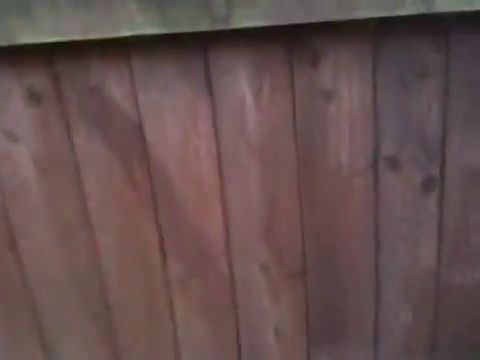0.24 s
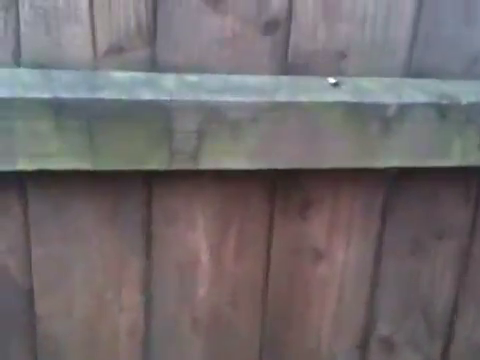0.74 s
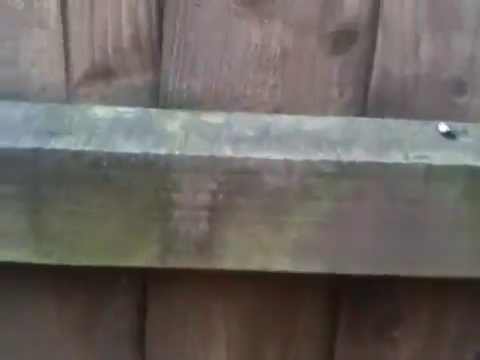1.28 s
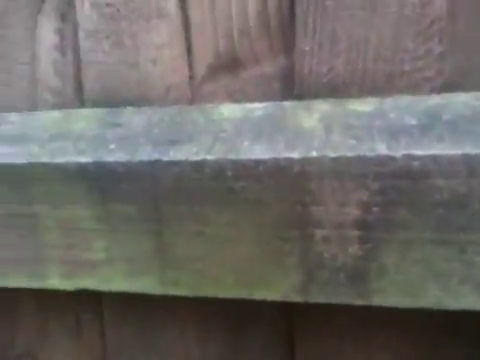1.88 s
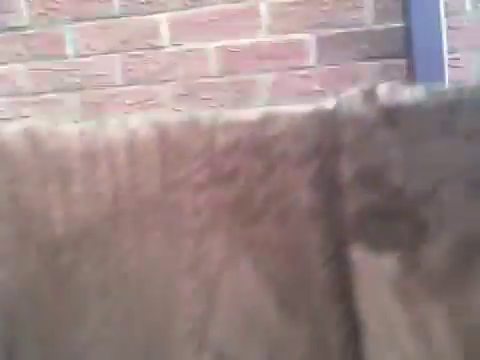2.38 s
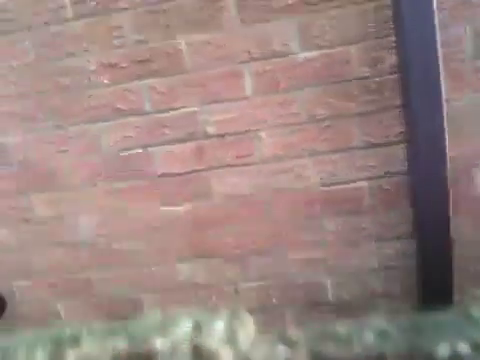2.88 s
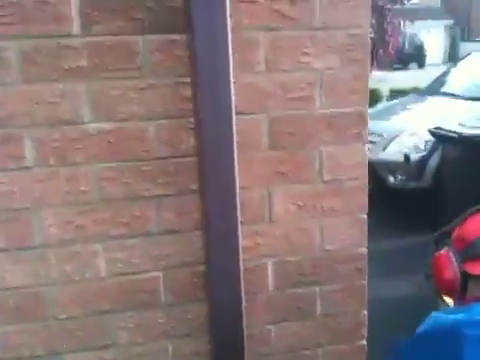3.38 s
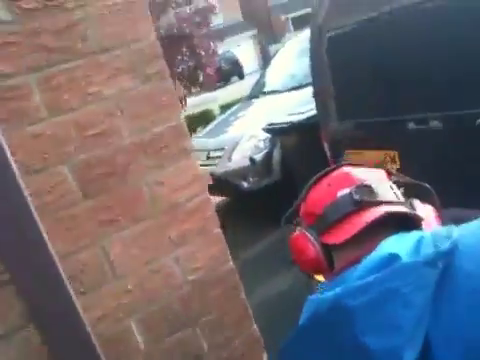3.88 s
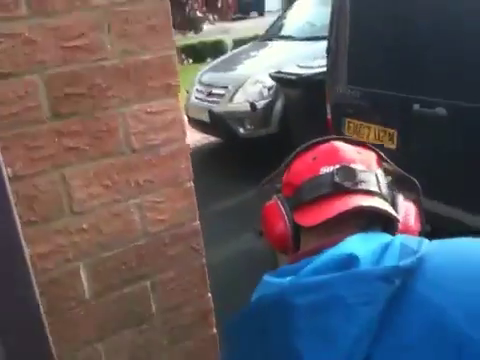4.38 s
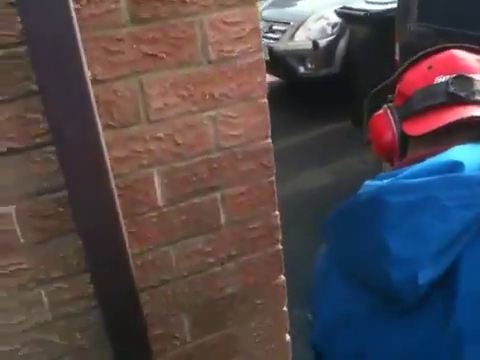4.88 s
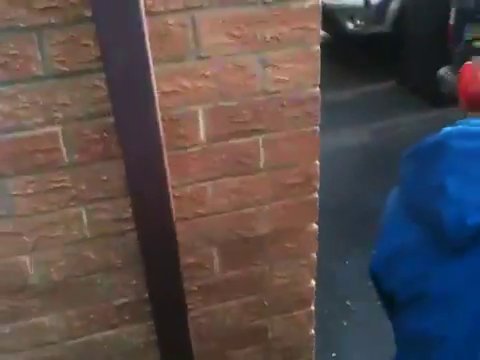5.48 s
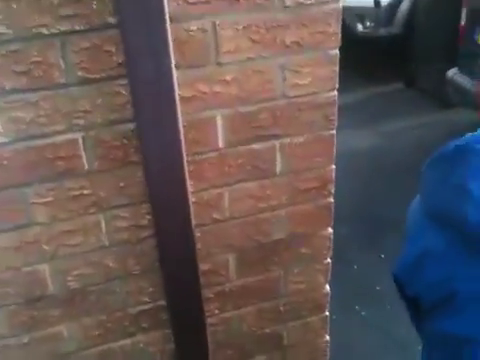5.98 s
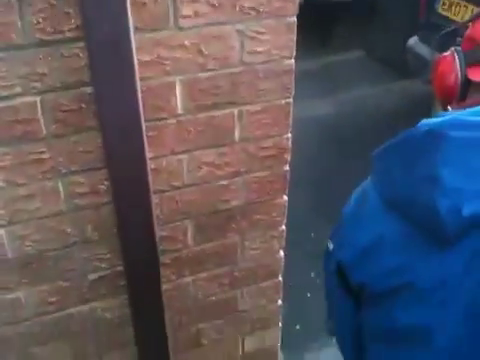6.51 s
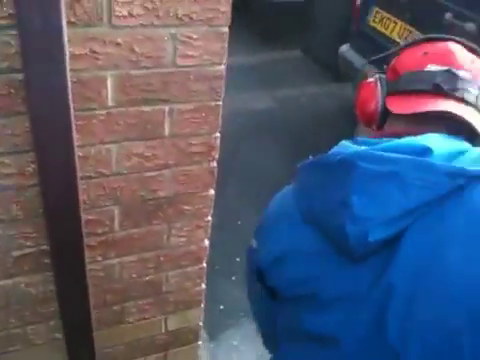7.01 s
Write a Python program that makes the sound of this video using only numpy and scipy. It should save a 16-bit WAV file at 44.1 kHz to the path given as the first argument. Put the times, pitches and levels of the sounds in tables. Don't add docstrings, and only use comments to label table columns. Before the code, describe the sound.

A low, buzzing engine hum with soft clatter runs alone at first, heard through a fence. Then a thump and a short burst of escaping air; the motor slows. Stuttering finger rubs and dull bumps accompany the moving phone microphone as the hiss climbs steeply. Past the wall corner it is a loud, broad, gritty air blast nearly covering the motor.

```python
import sys
import numpy as np
from scipy import signal
from scipy.fft import rfft, irfft, next_fast_len
from scipy.io import wavfile
from scipy.ndimage import uniform_filter1d, map_coordinates

SR = 44100
rng = np.random.default_rng(int(sys.argv[2]) if len(sys.argv) > 2 else 0)


def to_wav(s):
    ch = np.atleast_2d(s).T
    pcm = np.round(np.clip(ch, -1, 1) * 32767)
    wavfile.write(sys.argv[1], SR, pcm.astype(np.int16))


def gain_from_db(level_db):
    decades = np.asarray(level_db, float) / 20
    return 10 ** decades


N = 319725


def unit(x):
    return x / np.sqrt(np.mean(x ** 2) + 1e-20)


def along(points, hz):
    f, v = np.transpose(points)
    return np.interp(np.log(hz + 1), np.log(f + 1), v)


def curves(rows, t=None):
    s, *cols = np.transpose(rows)
    times = np.arange(N) / SR if t is None else t
    return [np.interp(times, s, c) for c in cols]


def wobble(rate):
    knots = rng.standard_normal(int(N * rate / SR) + 4)
    return map_coordinates(knots, [np.arange(N) * rate / SR])


def patches(shape, size):
    field = uniform_filter1d(rng.standard_normal(shape), size=size[0], axis=0)
    return unit(uniform_filter1d(field, size=size[1], axis=1))


def shaped(colour_db, patchy_db, size, gaps=False):
    hz, t, z = signal.stft(rng.standard_normal(N + size), SR, nperseg=size)
    level_db = colour_db(hz[:, None], t) + patchy_db * patches(z.shape, size=(6, 30))
    if gaps:
        depth = np.clip(5 * (patches(z.shape, size=(2, 12)) - 1.85), 0, 1)
        level_db = level_db - 18 * depth
    gain = gain_from_db(level_db)
    gain = gain / np.sqrt(np.mean(gain ** 2, axis=0))
    return unit(signal.istft(z * gain, SR, nperseg=size)[1][:N])


def rung(x, hz, width_hz):
    return signal.lfilter(*signal.iirpeak(hz, hz / width_hz, SR), x)


def rung_twice(x, hz, width_hz):
    return rung(rung(x, hz, width_hz), hz, width_hz)


# [t/s, state]
ENGINE_STATE = [
    (0, 0),
    (.58, 0),
    (.78, 1),
    (1.8, 1),
    (2.1, 2),
    (3.3, 2),
    (3.9, 3),
]


def by_state(values):
    return np.interp(curves(ENGINE_STATE)[0], np.arange(len(values)), values)


# [t/s, turns per s]
SHAFT_SPEED = [(0.0, 30.6), (0.08, 31.5), (0.34, 34.0), (0.44, 34.4), (0.81, 32.8), (1.35, 33.4),
               (1.84, 33.6), (2.02, 32.4), (2.12, 30.0), (2.22, 30.0), (2.44, 30.6), (2.77, 30.9),
               (3.21, 30.6), (3.39, 31.1), (4.42, 31.1), (5.4, 30.8), (5.9, 31.2), (7.25, 30.95)]
# [multiple of shaft speed, level/dB]
RACING_ORDERS = [(1, -39), (2, -22), (3, -26), (4, 0.5), (5, -0.5), (6, -11), (7, -7), (8, 5.5), (9, -12),
                 (10, -15), (11, -25), (12, -17), (13, -15), (14, -11), (15, -24), (16, -11), (17, -10),
                 (18, -20), (19, -15), (20, -13), (21, -7)]
FREE_ORDERS = [(1, -39), (2, -20), (3, -17), (4, 3.5), (5, 2), (6, -1.5), (7, 1), (8, 1.5), (9, -9),
               (10, -4), (11, -4.5), (12, -4.5), (13, -21), (14, -24), (15, -21), (16, -14), (17, -12),
               (18, -14), (19, -17), (20, -8), (21, -5.5)]
SLOWED_ORDERS = [(1, -37), (2, -26), (3, -17), (4, -3), (5, 3), (6, -3.5), (7, 3), (8, -4.5), (9, -16),
                 (10, -7), (11, -7), (12, -10), (13, -26), (14, -7), (15, -8), (16, -8), (17, -27),
                 (18, -11), (19, -13), (20, -23), (21, -11)]
PUMPING_ORDERS = [(1, -37), (2, -30), (3, -17), (4, 0), (5, 2), (6, -10.5), (7, 0), (8, 3), (9, -28),
                  (10, -0.5), (11, -13.5), (12, -12), (13, -15), (14, -10), (15, -20), (16, -16), (17, -28),
                  (18, -11), (19, -10), (20, -22), (21, -6)]
HUM_DB = [-39, -40.5, -34.5, -32]
CLATTER_DB = [-39.5, -39, -36, -31]
RUMBLE_DB = [-47.5, -58, -41, -39.5]
# [f/Hz, level/dB per Hz]
EXHAUST_COLOUR = [(20, -70), (40, -50), (75, -26), (110, -8), (150, -6), (260, -0.5), (380, -8), (600, -32),
                  (1500, -120)]
# [f/Hz, level/dB per Hz]
CASING_COLOUR = [(150, -46), (300, -9), (473, -14), (900, -6), (1500, -6), (1900, -8), (2400, -7),
                 (2900, -16), (5200, -23.5), (6400, -23), (8000, -26.5), (11400, -34.5), (14000, -44),
                 (17000, -58)]
# [f/Hz, width/Hz, level/dB, t/s, duration/s]
PANEL_RINGS = [(886, 24, -41, 1.57, 0.69), (897, 21, -45.5, 0.5, 0.3), (1670, 14, -45, 0.45, .14),
               (2250, 30, -48, 0.24, .08), (2190, 16, -49, 1.08, 0.17), (1434, 18, -46, 0.24, 0.2),
               (1454, 10, -46.5, 0.87, 0.5), (1295, 19, -45, 0.39, .14), (1370, 20, -47, 1.54, .15),
               (1180, 27, -45, 0.53, .06), (654, 25, -47.5, 1.04, 0.37), (683, 61, -41.5, 1.95, 0.13)]
# [t/s, level/dB, duration/s]
FOOTFALLS = [
    (0, -48, .05),
    (.68, -41, .05),
    (1.8, -36.5, 0.048),
    (3.15, -37.5, 0.15),
    (3.8, -37.5, 0.33),
    (4.15, -47, 0.088),
]


def compressor():
    t = np.arange(N) / SR
    speed = curves(SHAFT_SPEED)[0]
    phase = 2 * np.pi * np.cumsum(speed) / SR
    multiples = np.transpose(FREE_ORDERS)[0]
    orders_db = np.transpose([RACING_ORDERS, FREE_ORDERS, SLOWED_ORDERS, PUMPING_ORDERS])[1]
    hum = np.zeros(N)
    for k, state_db in zip(multiples, orders_db):
        level = gain_from_db(by_state(state_db) + 1.95 * wobble(5))
        hum += level * np.sin(k * phase + rng.uniform(0, 2 * np.pi))
    hum_db = by_state(HUM_DB) + 0.68 * (speed - 32.94)

    rumble = shaped(lambda hz, s: along(EXHAUST_COLOUR, hz) + 0 * s, patchy_db=1.6, size=4096)
    swell = gain_from_db(by_state(RUMBLE_DB))
    for s, db, wide in FOOTFALLS:
        swell = swell + gain_from_db(db) * np.exp(-((t - s) / wide) ** 2)

    clatter = shaped(lambda hz, s: along(CASING_COLOUR, hz) + 0 * s, patchy_db=0.93, size=2048)
    panels = np.zeros(N)
    for hz, width_hz, db, s, wide in PANEL_RINGS:
        ring = unit(rung(rng.standard_normal(N), hz, width_hz))
        panels += gain_from_db(db) * np.exp(-((t - s) / wide) ** 2) * ring
    return gain_from_db(hum_db) * unit(hum) + swell * rumble + gain_from_db(by_state(CLATTER_DB)) * clatter + panels


# [t/s, level/dB]
AIR_PUFFS = [(.28, -69), (2.1, -73), (2.7, -52), (3.16, -57), (3.43, -65), (3.67, -42), (3.94, -55),
             (4.16, -57), (4.54, -61), (5.94, -68), (6.14, -67), (6.3, -68), (6.46, -68), (6.62, -67),
             (6.93, -71), (7.1, -66)]


def buffet():
    t = np.arange(N) / SR
    band = signal.butter(4, [44, 85], "band", fs=SR, output="sos")
    low = signal.sosfilt(band, rng.standard_normal(N))
    push = gain_from_db(by_state([-74, -74, -82, -80]))
    for s, db in AIR_PUFFS:
        push = push + gain_from_db(db - 180 * np.abs(t - s))
    return push * unit(low * gain_from_db(3.7 * wobble(12)))


# [t/s, level/dB]
CASE_TICKS = [
    (.107, -56),
    (.268, -46),
]
# [t/s, level/dB, f/Hz, width/Hz, t60/s]
BUMPS = [
    (0.661, -36, 170, 90, .12),
    (1.75, -58, 35, 30, .1),
    (1.78, -24.5, 228, 24, 0.21),
    (1.83, -34.5, 390, 80, 0.22),
    (2.62, -23, 210, 60, 0.095),
    (3.12, -35, 280, 120, .15),
    (5.527, -24, 420, 281, 0.22),
]


def knocks():
    out, t = np.zeros(N + SR), np.arange(SR // 4) / SR
    for s, db, hz, width_hz, t60 in BUMPS:
        settled = rung_twice(rng.standard_normal(SR), hz, width_hz)[-len(t):]
        attack = np.clip(t / 0.018, 0, 1)
        out[round(s * SR):][:len(t)] += gain_from_db(db - 60 * t / t60) * attack * unit(settled)
    for s, db in CASE_TICKS:
        grit = rng.standard_normal(len(t))
        tick = unit(rung(grit, 11500, 500)) + unit(rung_twice(grit, 14800, 1400))
        out[round(s * SR):][:len(t)] += gain_from_db(db - 60 * t / .03) * tick
    return out[:N]


# [t/s, level/dB, screened by fence and wall 0-1, hump f/Hz, turned to phone/dB]
JET_PATH = [(1.75, -29, 0.96, 7600, -5), (2.04, -24.5, 0.9, 7700, 5.5), (2.42, -21.5, 1, 8200, -0.5),
            (2.64, -16, 1, 9800, -5.5), (2.82, -16, 0.9, 8460, -1.5), (3.2, -5, 1, 8900, -1),
            (3.39, -9.5, 0.8, 7700, 0), (3.71, -4.5, 1, 8440, 3.5), (3.85, -7, 0.78, 7650, 5),
            (3.99, -7.5, .1, 8200, 0), (4.11, -6.5, 0.15, 6600, 0.5), (4.36, -9, 0.08, 8100, 2.5),
            (5.09, -11.5, 0, 8900, -.5), (5.6, -10, 0.18, 7760, -1.5), (6.2, -10.5, 0.08, 8000, 2),
            (6.38, -8.5, 0.04, 8950, 2), (6.91, -10, 0.09, 8450, 0), (7.18, -6.5, 0.13, 8600, 4.5)]
# [f/Hz, level/dB per Hz]
NOZZLE_COLOUR = [(240, -33), (500, -6), (650, -5.5), (780, -11), (1050, -5), (2100, -2), (3200, -2),
                 (4500, -0.5), (6000, 0.5), (8000, -3), (9500, -1), (11500, -1.5), (13500, -3.5),
                 (17300, -6)]
# [t/s, f/Hz, level/dB]
WALL_NOTCH = [
    (3.55, 17000, -1),
    (3.7, 15300, -4),
    (3.85, 11500, -5),
    (4.05, 8700, -5),
    (4.4, 8500, -3),
]


def jet():
    open_s = 1.75

    def burst_db(t):
        burst = 5 * np.exp(-((t - open_s) / 0.059) ** 4)
        return burst - 4 * np.exp(-((t - 1.848) / 0.029) ** 2)

    def colour_db(hz, t):
        level_db, screened, hump_hz, turn_db = curves(JET_PATH, t)

        def behind(in_view, hidden):
            return in_view + (hidden - in_view) * screened

        hump_db, valley_db = behind(2, 6.5), behind(-12, -5)
        low_db, edge_hz = behind(-9.5, -4.5), behind(4350, 6600)
        hump_db = hump_db + 0.55 * turn_db - 0.18 * burst_db(t)
        hump = hump_db * np.exp(-(np.log((hz + 1) / hump_hz) / 0.22) ** 2)

        notch_hz, notch_db = curves(WALL_NOTCH, t)
        fade = np.clip((4.55 - t) / .2, 0, 1)
        notch = notch_db * fade * np.exp(-((hz - notch_hz) / 800) ** 2)
        top = (1.5 + turn_db) / (1 + (12500 / (hz + 1)) ** 12)

        lag_db = (1 - 0.45) * burst_db(t) + (1 - 0.74) * np.clip(level_db + 12.5, 0, None)
        foot = 1 / (1 + (hz / 2250) ** 6)
        below_edge = 1 / (1 + (hz / edge_hz) ** 12)
        valley = (valley_db + 0.17 * turn_db) * (1 - foot)
        low = (low_db * foot + valley - lag_db) * below_edge
        drift = 1.16 * patches(low.shape, size=(8, 60)) * below_edge
        return along(NOZZLE_COLOUR, hz) + hump + notch + top + low + drift

    t = np.arange(N) / SR
    valve = np.clip((t - open_s) / .008, 0, 1)
    flutter = gain_from_db(0.26 * wobble(4.16) + 0.17 * wobble(8) + 0.5 * wobble(40))
    hiss = shaped(colour_db, patchy_db=1.5, size=512, gaps=True)
    return valve * gain_from_db(curves(JET_PATH)[0] + burst_db(t)) * flutter * hiss


# [t/s, length/s, hollow level/dB, upper resonance f/Hz, its level/dB]
FINGER_RUBS = [
    (2.452, .1, -19, 2100, -21),
    (2.527, 0.1, -17.5, 2420, -22),
    (3.099, 0.062, -16.5, 2620, -20.5),
    (4.052, 0.16, -21.5, 1820, -18),
]


def fingers():
    t, out = np.arange(N) / SR, np.zeros(N)
    since = (t - 2.4685) % .01105
    snap = gain_from_db(-60 * since / .007 + 1.8 * wobble(90))
    slips = (.4 + snap) * rng.standard_normal(N)
    slips = slips + 2.5 * snap * (since < 2 / SR)

    def resonance(hz, width_hz):
        return unit(rung_twice(slips, hz, width_hz))

    steps_hz = np.geomspace(1400, 2600, num=5)
    step_log = np.log(steps_hz[1] / steps_hz[0])
    glide = [resonance(hz, 810) for hz in steps_hz]
    hollow, grit, palm = resonance(1136, 1040), resonance(2670, 1200), resonance(526, 190)
    for s, length, hollow_db, rest_hz, upper_db in FINGER_RUBS:
        done = np.clip((t - s) / length, 0, 1)
        grip_db = 8 * np.log2(rest_hz / 2010)
        stroke = np.clip(np.minimum(t - s, s + length - t) / 0.018, 0, 1)
        pressure_db = -12.5 * np.clip(1 - (t - s) / 0.046, 0, 1) + (-2 + grip_db) * done ** 2
        upper_hz = rest_hz * (1 - 0.17 * np.sin(np.pi * done ** 0.68))
        upper = np.zeros(N)
        for hz, ring in zip(steps_hz, glide):
            upper += np.clip(1 - np.abs(np.log(upper_hz / hz)) / step_log, 0, 1) * ring
        grit_db = -12 + (5 + grip_db) * done
        hand = hollow + gain_from_db(grit_db) * grit + gain_from_db(-14) * palm
        out += stroke * (gain_from_db(hollow_db + pressure_db) * hand + gain_from_db(upper_db) * upper)
    return out


def scene():
    return (compressor() + buffet() + knocks() + jet() + fingers())[None]


def roll_off(x):
    return signal.sosfilt(signal.butter(12, 18470, fs=SR, output="sos"), x)


def record(dry):
    rounded = dry / (1 + np.abs(dry / 1.1) ** 5) ** (1 / 5)
    size = next_fast_len(N + SR // 4)
    edge = np.clip((17330 - np.fft.rfftfreq(size, 1 / SR)) / 90, 0, 1)
    band_limit = np.sin(edge * np.pi / 2) ** 2
    mix = irfft(rfft(rounded, size) * band_limit, size)[:, :N]
    return roll_off(mix)


dry = scene()
out = record(dry)
to_wav(out)
```